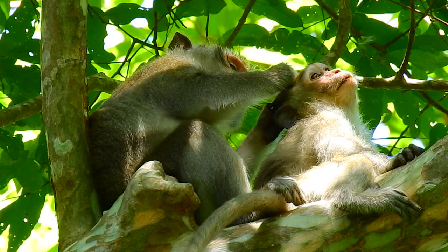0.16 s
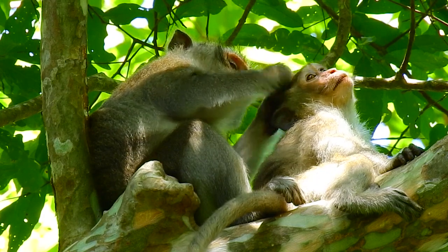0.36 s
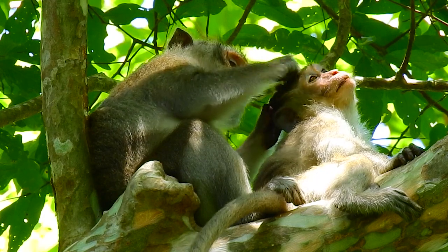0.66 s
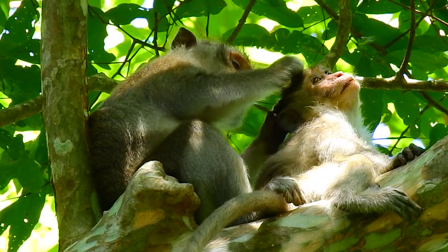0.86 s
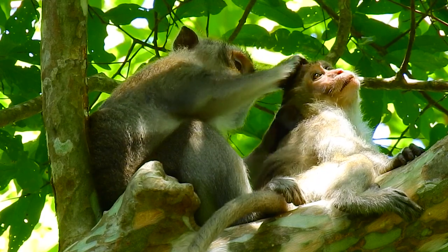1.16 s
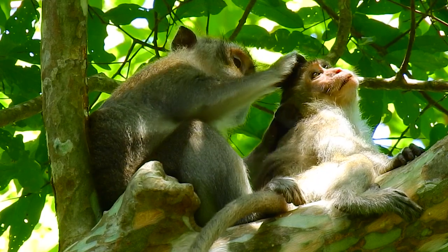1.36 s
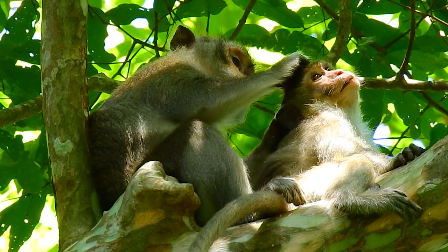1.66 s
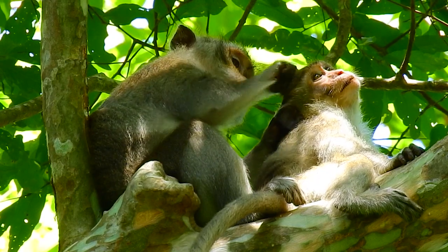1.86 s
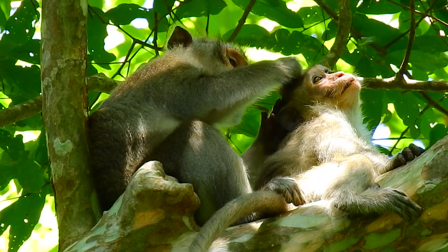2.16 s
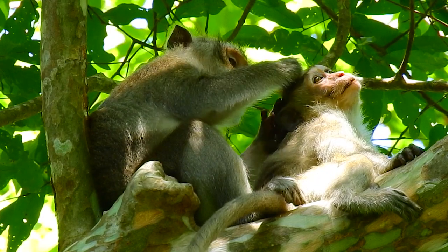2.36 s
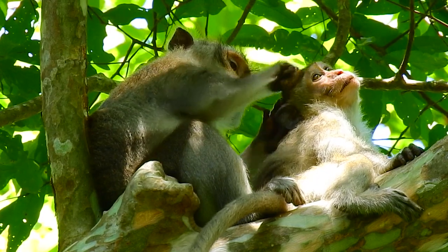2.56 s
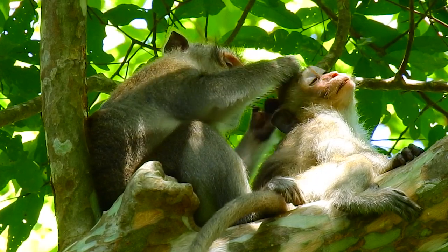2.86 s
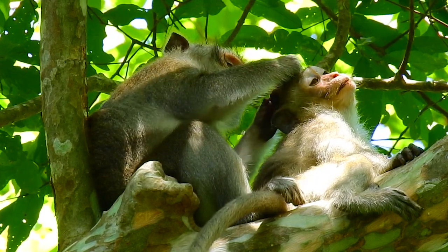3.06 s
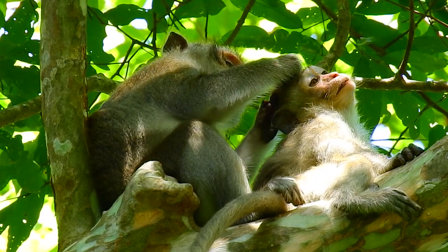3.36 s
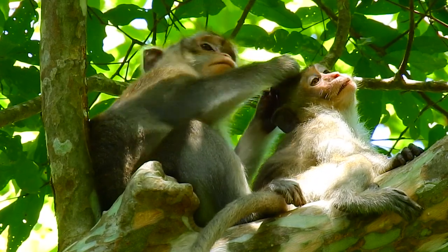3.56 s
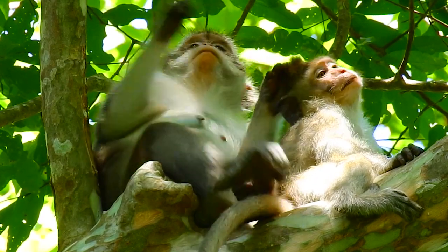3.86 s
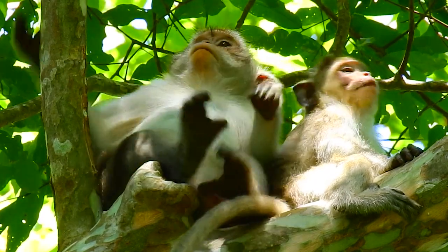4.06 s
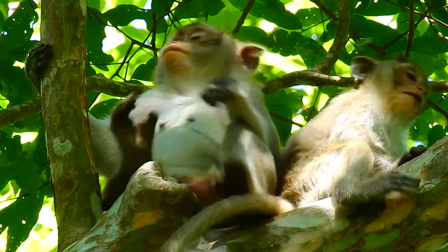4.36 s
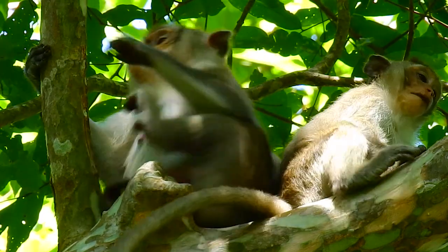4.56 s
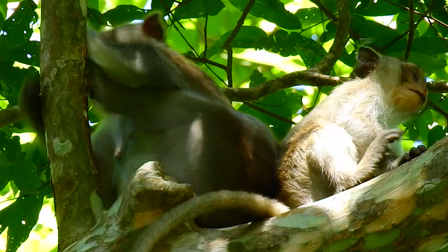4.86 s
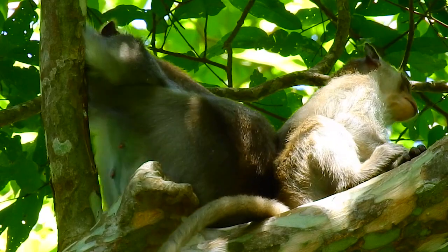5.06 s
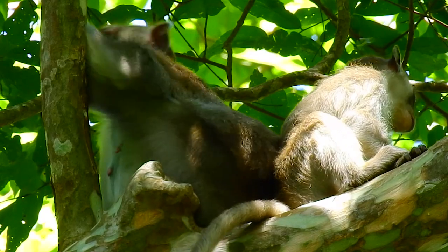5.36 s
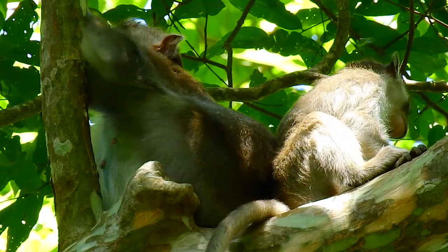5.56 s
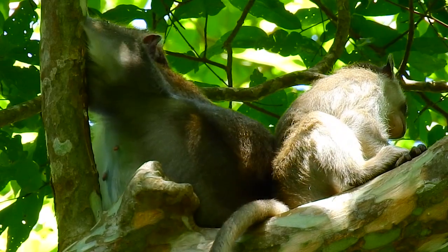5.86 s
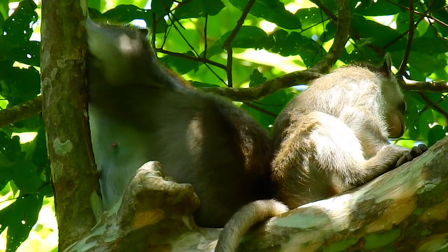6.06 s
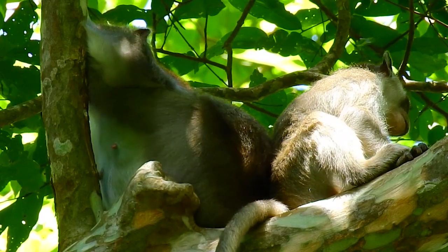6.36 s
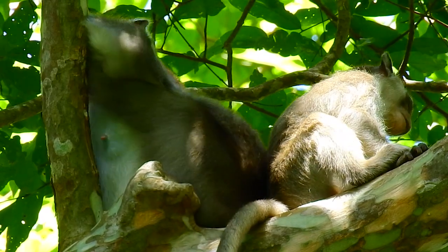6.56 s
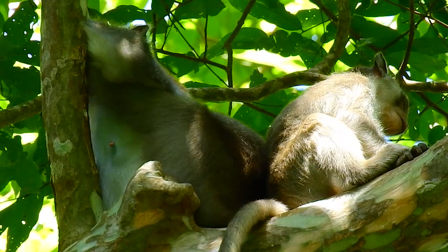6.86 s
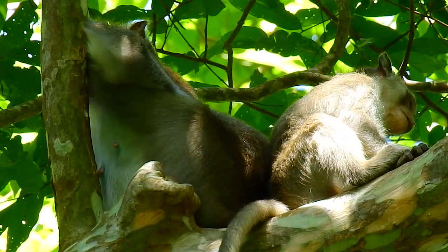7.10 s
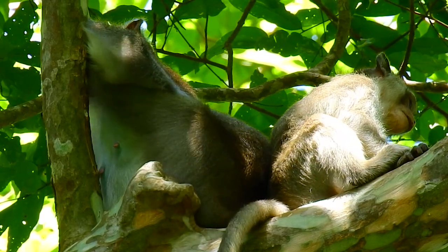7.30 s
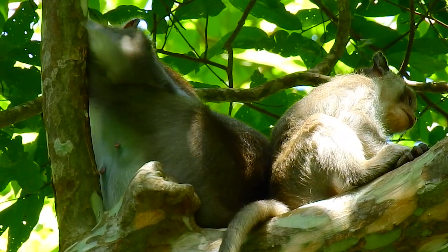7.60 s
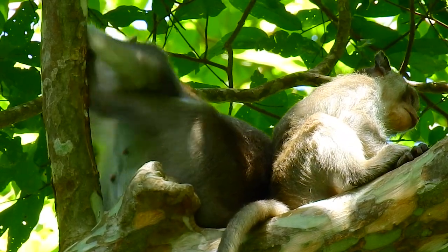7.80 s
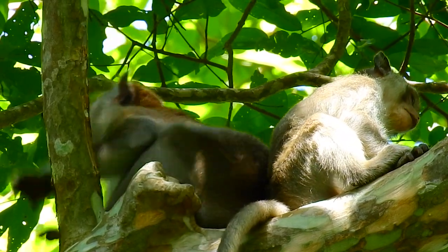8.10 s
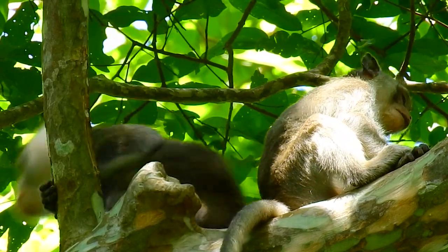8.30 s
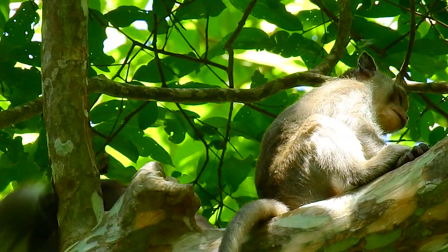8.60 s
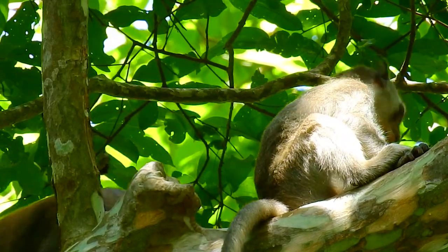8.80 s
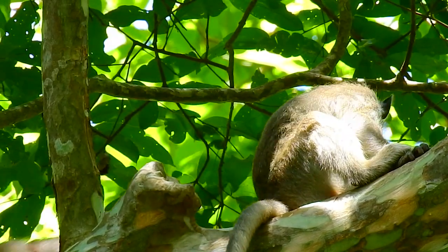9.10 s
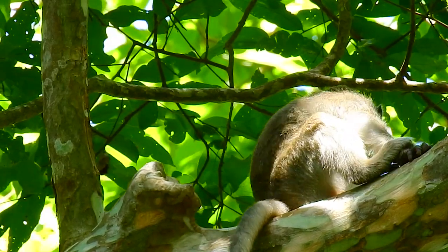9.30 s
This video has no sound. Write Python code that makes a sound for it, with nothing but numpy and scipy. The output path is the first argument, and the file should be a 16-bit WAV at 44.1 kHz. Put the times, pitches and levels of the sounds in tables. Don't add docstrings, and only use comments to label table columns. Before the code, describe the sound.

Wide stereo from inside a tropical forest by day. Cicadas sing continuously, high and fluttering, with a thin cricket trill and steady hiss. Five dry katydid rasps recur at near-even spacing, the fourth strongest. Far birds drop quick, pure whistles that echo, in loose clusters. Close limbs scuff bark and stir leaves quietly, with a clear woody knock late on and a lighter tap after it. A distant engine throbs very low.

```python
import sys
import numpy as np
from scipy import signal
from scipy.fft import rfft, irfft, next_fast_len
from scipy.io import wavfile
from scipy.ndimage import uniform_filter1d, map_coordinates

SR = 44100
rng = np.random.default_rng(int(sys.argv[2]) if len(sys.argv) > 2 else 0)


def volts_from_decibels(level):
    exponent = np.asarray(level, float) / 20
    return 10 ** exponent


def master_out(mix):
    frames = np.transpose(np.atleast_2d(mix))
    ceiling = np.clip(frames, -1, 1)
    pcm = np.round(ceiling * 32767).astype(np.int16)
    wavfile.write(sys.argv[1], SR, pcm)


N = 416304
CLOCK = np.arange(N) / SR
SIDES = np.array([[0.5], [-0.5]])


def unit(x):
    return x / np.sqrt(np.mean(x ** 2) + 1e-20)


def along(points, hz):
    f, value = np.transpose(points)
    return np.interp(np.log(hz + 1), np.log(f + 1), value)


def curves(rows):
    s, *columns = np.transpose(rows)
    return [np.interp(CLOCK, s, column) for column in columns]


def wobble(rate):
    knots = rng.standard_normal(int(N * rate / SR) + 4)
    return map_coordinates(knots, [np.arange(N) * rate / SR])


def turns(hz):
    return 2 * np.pi * np.cumsum(hz * np.ones(N)) / SR


def filtered(x, response):
    size = next_fast_len(N + 8192)
    return irfft(rfft(x, size) * response(np.fft.rfftfreq(size, 1 / SR)), size)[..., :N]


def ringing(x, modes):
    def response(f):
        total = 0
        for k, (centre, width, db) in enumerate(modes):
            damping = 1j * f * width
            total = total + (-1) ** k * volts_from_decibels(db) * damping / (centre * centre - f * f + damping)
        return total ** 2
    return unit(filtered(x, response))


# pitch_hz, likeness [0-1]
LIKENESS = [(60, 0.98), (130, 0.76), (290, 0.53), (640, 0.67), (1410, 0.65), (3100, 0.58), (6820, 0.073),
            (15000, 0.064)]
# pitch_hz, left_right_db
LEFT_LEAN = [(50, -0.5), (300, 2.1), (1000, 0.5), (6000, -0.5), (12000, 0.5)]


def rush(spectrum, patchy_db):
    z = signal.stft(rng.standard_normal((2, N)), nperseg=512)[2]
    patches = uniform_filter1d(rng.standard_normal(z.shape[1:]), size=6, axis=0)
    patches = uniform_filter1d(patches, size=14, axis=1)
    pair = signal.istft(z * volts_from_decibels(patchy_db * unit(patches)), nperseg=512)[1][:, :N]

    def mid_side(hz):
        angle = np.arccos(np.clip(along(LIKENESS, hz), -1, 1)) / 2
        return volts_from_decibels(along(spectrum, hz)) * [np.cos(angle), np.sin(angle)]

    mid, side = filtered(pair, mid_side)
    stereo = np.array([mid + side, mid - side])
    return unit(filtered(stereo, lambda hz: volts_from_decibels(along(LEFT_LEAN, hz) * SIDES)))


def forest(x, t60, wet_db, alike, sway):
    t = np.arange(SR) / SR
    blend = np.array([wobble(sway) for _ in range(3)])
    blend /= np.linalg.norm(blend, axis=0)
    share = np.clip(alike, 0, 1)
    wet = np.zeros((2, N))
    for weight in blend:
        common, left, right = rng.standard_normal((3, SR)) * volts_from_decibels(-60 * t / t60) * (1 - np.exp(-t / 0.01))
        tail = np.sqrt(share) * common + np.sqrt(1 - share) * np.array([left, right])
        tail /= np.linalg.norm(tail[0])
        wet += signal.fftconvolve((x * weight)[None], tail, axes=1)[:, :N]
    return (x + volts_from_decibels(wet_db) * wet) / np.sqrt(1 + volts_from_decibels(2 * wet_db))


def singer(hz, beat_hz, swing, overtones):
    phase = turns(beat_hz * (1 + 0.02 * wobble(3.1))) + rng.uniform(0, 2 * np.pi)
    bend = swing * np.sin(2 * phase + 0.45 * np.sin(phase)) + 0.0003 * wobble(12)
    drum = turns(hz / 5 * (1 + bend))
    pulse_db = 2.45 * np.cos(phase) + 0.45 * np.cos(2 * phase + 0.25) + 0.8 * np.cos(3 * phase + 2.08)
    return unit(volts_from_decibels(pulse_db) * sum(volts_from_decibels(db) * np.sin(k * drum) for k, db in overtones))


# time_s, near_hz, far_hz
CICADA_PITCH = [(0, 7300, 7490), (1.2, 7274, 7500), (2.3, 7308, 7540), (3.6, 7274, 7530), (5.5, 7301, 7590),
                (6.3, 7310, 7560), (7.5, 7295, 7555), (9.44, 7326, 7560)]
# time_s, level_db, left_right_db
NEAR_CICADA = [(0.0, -38, -14), (0.18, -38.5, 14.5), (0.23, -40, -2), (0.6, -36.5, 1.5), (1.45, -39, 2.5),
               (3.13, -38, 3), (6.68, -37, 1), (7.28, -38, 4.5), (7.36, -37.5, -3), (7.49, -39.5, 2.5),
               (7.84, -37.5, 0.5), (8.12, -37.5, 3.5), (9.41, -38, 1.0), (9.44, -41, -1.0)]
# time_s, far_level_db, late_level_db
FAR_CICADAS = [(0, -50.5, -95), (2.5, -51.5, -95), (5, -49, -95), (7.3, -50.5, -90), (8, -49.5, -67),
               (9.44, -52, -71)]
# multiple, level_db
DRUM_OVERTONES = [(4, -28.5), (5, 0.5), (6, -33)]


def cicadas():
    near_hz, far_hz = curves(CICADA_PITCH)
    near_db, pan_db = curves(NEAR_CICADA)
    far_db, late_db = curves(FAR_CICADAS)
    near = forest(singer(near_hz, 11.0, 0.01, DRUM_OVERTONES), 0.41, 14.0, 0.14, 4.5)
    near /= np.sqrt(uniform_filter1d(near ** 2, size=SR // 2, axis=1))
    far = volts_from_decibels(far_db) * singer(far_hz, 7.7, 0.012, [(5, 0)])
    late = volts_from_decibels(late_db) * singer(7100, 11.0, 0.0076, [(5, 0)])
    return volts_from_decibels(near_db + 3.5 + pan_db * SIDES) * near + forest(far + late, 0.36, 8.7, 0.096, 2.9)


def wing_strokes(rate_hz, scatter_db, sharp):
    phase = turns(rate_hz * (1 + 0.015 * wobble(7)))
    swells = (0.5 + 0.5 * np.cos(phase)) ** sharp
    return unit(swells * volts_from_decibels(scatter_db * wobble(rate_hz * 0.6))), phase


# start_s, length_s, peak_db
KATYDID_RASPS = [
    (0.288, 0.41, -43.5),
    (2.5, 0.27, -46.5),
    (4.721, 0.31, -46),
    (6.708, 0.32, -42.5),
    (8.73, 0.21, -42.5),
]
# pitch_hz, width_hz, level_db
WING_MODES = [(3790, 230, -2), (3990, 280, 0)]
# pitch_hz, width_hz, level_db
SCRAPE_MODE = [(4300, 600, -7)]
# pitch_hz, width_hz, level_db
BODY_MODES = [(3094, 540, 4.5), (2120, 640, 2)]


def katydid():
    strokes, phase = wing_strokes(101, 4.6, 0.59)
    clicks = np.diff(np.floor(phase / (2 * np.pi)), prepend=0) * volts_from_decibels(0.86 * wobble(60))
    drive = unit(clicks) + 1.2 * strokes * rng.standard_normal(N)
    low, high = [volts_from_decibels(mode[2]) * ringing(drive, [mode]) for mode in WING_MODES]
    scrape = volts_from_decibels(SCRAPE_MODE[0][2]) * ringing(strokes * rng.standard_normal(N), SCRAPE_MODE)
    body = volts_from_decibels(-6.5) * ringing(drive + 3.0 * rng.standard_normal(N), BODY_MODES)
    out = np.zeros(N)
    for start, length, peak_db in KATYDID_RASPS:
        age = CLOCK - start
        swell_db = np.interp(age, [0, 0.095, 0.21, length, length + 1], [-13, 0, -8.5, -10.5, -210.5])
        db = peak_db + swell_db
        climb = np.pi / 2 * (1 - np.exp(-np.clip(age, 0, 1) / 0.049))
        wing = np.cos(climb) * low + np.sin(climb) * high
        sound = wing + scrape * volts_from_decibels(0.5 * (db - peak_db) - 3) + body
        out += np.clip(age / 0.028, 0, 1) * volts_from_decibels(db + 1.5) * sound
    return forest(out, 0.31, -0.27, 0.93, 5.5)


# start_s, length_s, top_hz, level_db
ARCH_NOTES = [(2.055, 0.084, 1810, -59), (6.09, .11, 1780, -56.5), (9.275, .091, 1910, -55)]
HOOK_NOTES = [(3.115, .085, 1543, -54.5), (7.27, 0.067, 1563, -54), (8.23, 0.066, 1586, -55.5)]
FALL_NOTES = [(2.79, 0.084, 1660, -56), (3.63, .035, 2260, -60), (3.79, .055, 2030, -59),
              (5.8, .046, 1650, -58), (6.87, 0.055, 1640, -52), (7.9, 0.072, 1623, -54),
              (8.18, 0.032, 1237, -54), (8.89, 0.065, 1772, -56)]
DROOP_NOTES = [(2.235, .07, 1468, -54), (3.24, .07, 1381, -57), (6.36, 0.062, 1353, -54.5),
               (7.47, .041, 1192, -56.5), (8.32, 0.074, 1437, -53), (8.59, .09, 1290, -63),
               (8.95, .07, 10450, -75)]
HUMP_NOTES = [(2.15, 0.048, 974, -55), (2.31, 0.057, 1401, -52.5), (2.2, 0.028, 1254, -59),
              (2.86, 0.057, 1540, -59.5), (3.3, 0.097, 1348, -59), (4.14, 0.041, 930, -60),
              (4.22, 0.055, 970, -58), (4.92, .05, 1153, -62.5), (5.73, .04, 1940, -60),
              (6.26, 0.053, 1405, -53), (6.33, 0.071, 1405, -52.5), (7.37, 0.03, 1272, -54.5),
              (7.42, 0.19, 2250, -66.5), (7.94, .05, 1725, -58), (8.21, 0.025, 1375, -65),
              (8.43, .065, 1400, -63), (8.43, 0.039, 1183, -56), (9.37, 0.045, 997, -57),
              (6.2, .05, 983, -61)]
ARCH_PATH = [(0, .72), (.22, .92), (.45, 0.99), (.72, .77), (1, .56)]
HOOK_PATH = [(0, 0.96), (.3, 1), (.5, .99), (.75, .86), (1, 0.734)]


def birds():
    shapes = [
        (ARCH_NOTES, lambda u, length: np.interp(u, *np.transpose(ARCH_PATH))),
        (HOOK_NOTES, lambda u, length: np.interp(u, *np.transpose(HOOK_PATH))),
        (FALL_NOTES, lambda u, length: 1 - 3.8 * length * u),
        (DROOP_NOTES, lambda u, length: 1 - 1.504 * length * u),
        (HUMP_NOTES, lambda u, length: 1 - 0.026 * (2 * u - 1) ** 2),
    ]
    out = np.zeros(N + SR)
    for notes, bend in shapes:
        for start, length, top_hz, db in notes:
            u = np.linspace(0, 1, int(length * SR))
            swell = np.abs(np.sin(np.pi * u)) ** 0.18
            tone = np.sin(2 * np.pi * np.cumsum(top_hz * bend(u, length)) / SR)
            out[round(start * SR):][:len(u)] += volts_from_decibels(db + 10) * swell * tone
    return forest(out[:N] * volts_from_decibels(2.1 * wobble(70)), 1.4, 0.3, 0.91, 30)


# start_s, length_s, start_hz, glide_hz, level_db
FAR_RASPS = [(.1, 0.11, 5750, 34, -56), (0.73, .12, 5720, 80, -58), (1.22, .12, 5350, 1450, -49.5),
             (1.2, .27, 5750, 251, -51), (1.28, .3, 6700, 30, -48), (1.5, .35, 3700, 3, -56),
             (2.296, 0.21, 3400, -73, -55), (3.048, 0.28, 3420, -130, -55.5),
             (5.697, 0.35, 3700, 73.5, -56), (6.379, 0.29, 3490, -190, -53.5), (3.8, 0.2, 1897, -120, -50),
             (2.552, .23, 2530, -610, -55.5), (7.939, 0.15, 1645, -95, -50), (6.748, 0.24, 1730, -85, -47),
             (7.598, 0.15, 3440, -22, -53.5), (7.5, 0.5, 1750, 201, -57), (8.45, 0.34, 1900, -100, -55.5),
             (9, 0.395, 1900, 49.5, -57.5), (1.45, .4, 1700, 49, -57), (8.1, 0.296, 2000, -58.5, -49.5),
             (8.764, 0.19, 1910, -78.5, -46)]
# start_s, length_s, level_db
BUZZ_BOUTS = [(0.08, 0.22, -51), (.35, 0.83, -45), (1.25, 0.96, -46), (2.55, 0.22, -62), (3.1, 0.62, -57),
              (4.75, 0.28, -58), (6.6, 0.35, -52), (7.85, 0.66, -48), (8.654, 0.63, -45.5)]
# pitch_hz, width_hz, level_db
BUZZ_MODES = [(2612, 146, 2.5), (2744, 700, -1), (2947, 205, 0.5)]


def chorus():
    out = np.zeros(N)
    strokes = wing_strokes(100, 4.4, 0.12)[0]
    for start, length, hz, glide_hz, db in FAR_RASPS:
        u = np.clip((CLOCK - start) / length, 0, 1)
        width_hz = 0.075 * hz if hz > 5000 else 430
        noisy_tone = wobble(width_hz) * np.sin(turns(hz + glide_hz * u))
        out += volts_from_decibels(db - 0.5) * np.sin(np.pi * u) ** 0.11 * strokes * noisy_tone
    buzz = ringing(rng.standard_normal(N) * wing_strokes(105, 2.4, 0.31)[0], BUZZ_MODES)
    bouts = np.zeros(N)
    for start, length, db in BUZZ_BOUTS:
        outside_s = np.clip(np.maximum(start - CLOCK, CLOCK - start - length), 0, None)
        bouts += volts_from_decibels(db - 100 * outside_s)
    out += bouts * volts_from_decibels(1.1 * wobble(2.31) - 9.5) * buzz
    return forest(out, 0.82, -0.0066, 0.76, 3)


# centre_s, length_s, bark_scuff_db, leaf_db
LIMB_MOVES = [(.1, 0.11, -57, -76), (0.239, 0.04, -54, -68), (.45, 0.038, -57, -63), (0.527, .04, -54, -73),
              (.95, 0.023, -59, -66), (0.995, .03, -68, -62), (1.175, 0.049, -53, -67),
              (1.516, 0.09, -56.5, -62), (1.706, 0.056, -57, -61), (1.81, 0.045, -55.5, -59),
              (2.034, 0.096, -54.5, -58), (2.4, 0.4, -61.5, -67), (2.53, .04, -56, -62),
              (3.0, 0.55, -61, -72), (3.411, 0.065, -52.5, -73), (3.524, .03, -61, -73),
              (4.305, 0.65, -59, -84), (4.5, 0.21, -58, -60), (4.787, 0.12, -57.5, -61),
              (5.1, 0.054, -55, -75), (5.212, 0.04, -52.5, -60), (5.685, 0.1, -52.5, -66),
              (5.797, .1, -71, -58), (6.55, 0.12, -50.5, -58.5), (6.706, .04, -52.5, -62),
              (6.81, 0.13, -60.5, -62), (8.15, .25, -61.5, -77), (8.82, 0.12, -62, -66),
              (9.254, 0.17, -61, -70)]
# pitch_hz, density_db [dB per Hz]
SCUFF_SPECTRUM = [(150, -28), (250, 0.5), (500, 0), (1000, -3.5), (2000, -8), (4000, -16), (6000, -37)]
# pitch_hz, density_db [dB per Hz]
LEAF_SPECTRUM = [(1500, -12), (2500, -8.5), (4500, -2.5), (6500, 0), (8000, -5), (10000, -45), (15000, -50)]
# start_s, peak_db, pitch_hz
TWIG_TAPS = [
    (0.989, -49, 2700),
    (6.454, -16, 654),
    (8.409, -25, 1350),
]


def rustle():
    still_db = np.array([[-60.5], [-64.5]])
    power = volts_from_decibels(2 * still_db) * np.ones(N)
    for centre, length, scuff_db, leaf_db in LIMB_MOVES:
        swell = np.exp(-(2 * (CLOCK - centre) / length) ** 2)
        power += volts_from_decibels(2 * np.array([[scuff_db], [leaf_db]])) * swell
    scuff, leaf = np.sqrt(power)
    out = scuff * volts_from_decibels(4.0 + 1.47 * wobble(35)) * rush(SCUFF_SPECTRUM, 2.3)
    out += leaf * volts_from_decibels(5.5 + 1.16 * wobble(60)) * rush(LEAF_SPECTRUM, 0.64)
    t = np.arange(SR // 10) / SR
    for s, db, hz in TWIG_TAPS:
        ring = np.sin(2 * np.pi * hz * t) + 0.23 * np.sin(2 * np.pi * 1.3 * hz * t)
        ring += 0.3 * volts_from_decibels(-60 * t / 0.01) * rng.standard_normal(len(t))
        first = round(s * SR)
        out[:, first:first + len(t)] += volts_from_decibels(db - 19.0 - 60 * t / 0.07) * (1 - np.exp(-t / 0.0022)) * ring
    return out


# time_s, pitch_hz, level_db
CRICKET_TRILL = [(0, 6000, -66), (4.4, 5860, -61.5), (5.2, 5864, -68), (9.44, 5900, -66)]


def cricket():
    hz, db = curves(CRICKET_TRILL)
    return forest(volts_from_decibels(db + 4.6 * wobble(7)) * np.sin(turns(hz + 5 * wobble(9))), 0.78, 1.1, 0.47, 3)


# pitch_hz, level_db
ENGINE_ORDERS = [(48.6, -50.5), (94.2, -54.5), (188.6, -58.5)]
# pitch_hz, density_db [dB per Hz]
RUMBLE_SPECTRUM = [(22, -60), (33, -36), (42, -9), (60, -2), (92, -2.5), (161, -8), (200, -10), (249, -22),
                   (300, -63), (400, -53)]


def engine():
    shaft = turns(9.42)
    throb = 1 + 0.16 * np.cos(shaft) + 0.16 * np.cos(2 * shaft + 1.3) + 0.14 * np.cos(3 * shaft + 2.1)
    orders = np.zeros(N)
    for hz, db in ENGINE_ORDERS:
        orders += volts_from_decibels(db + 2.5 + 1.86 * wobble(3.7)) * np.sin(turns(hz + 1.106 * wobble(3)))
    return orders + volts_from_decibels(-46.0) * throb * rush(RUMBLE_SPECTRUM, 0.17)


# pitch_hz, density_db [dB per Hz]
HISS_SPECTRUM = [(140, -54), (230, -19), (280, -17.5), (1230, -27), (1600, -20), (3600, -25), (5500, -23),
                 (6900, -24), (7850, -44), (8100, -36), (9300, -32), (10200, -32), (15600, -43.5)]


def hiss():
    return volts_from_decibels(-56) * rush(HISS_SPECTRUM, 0.57)


def scene():
    insects = cicadas() + cricket() + katydid() + chorus()
    return insects + birds() + rustle() + engine() + hiss()


def top_cut(x):
    return signal.sosfilt(signal.butter(12, 15780, fs=SR, output="sos"), x)


def record(dry):
    mix = filtered(dry, lambda hz: hz < 15780)
    return top_cut(mix)


dry = scene()
out = record(dry)
master_out(out)
```